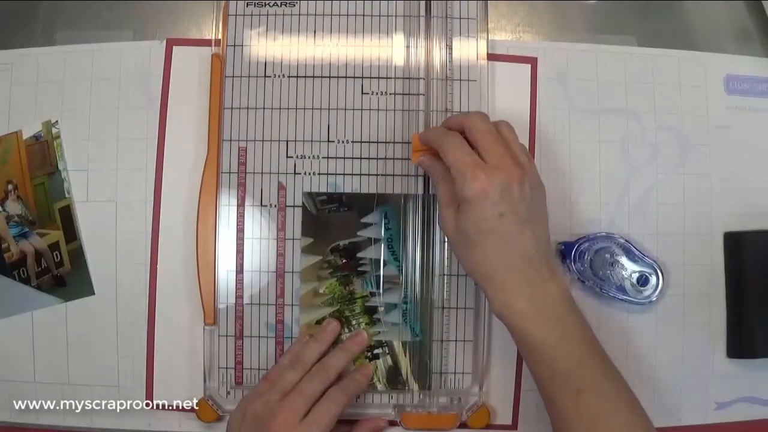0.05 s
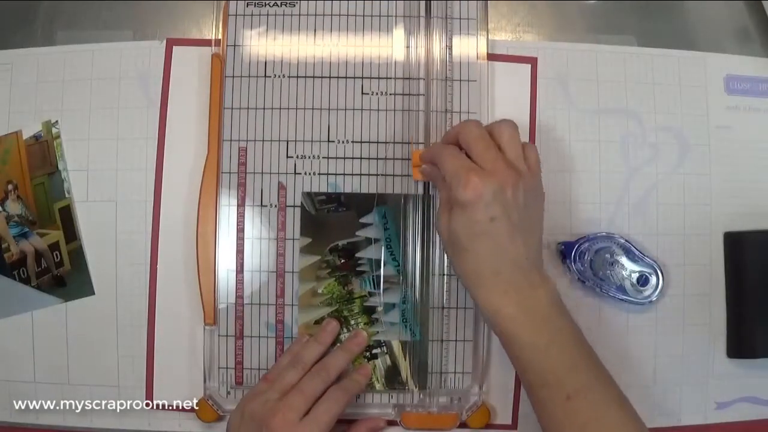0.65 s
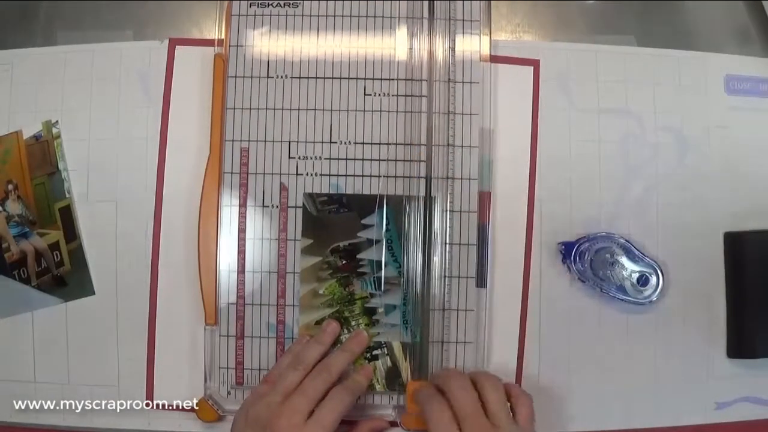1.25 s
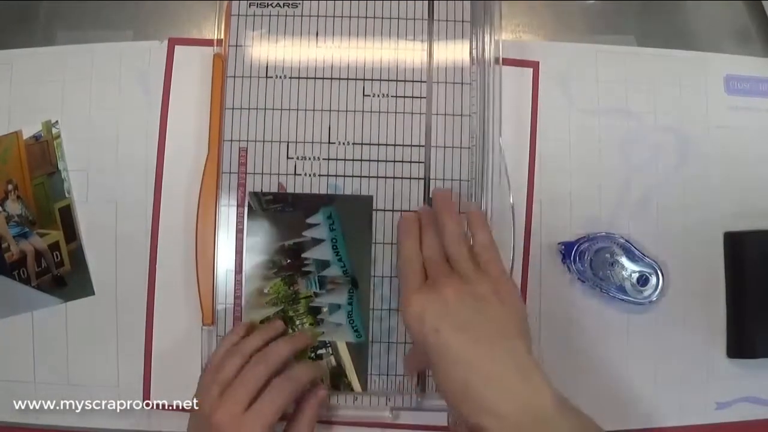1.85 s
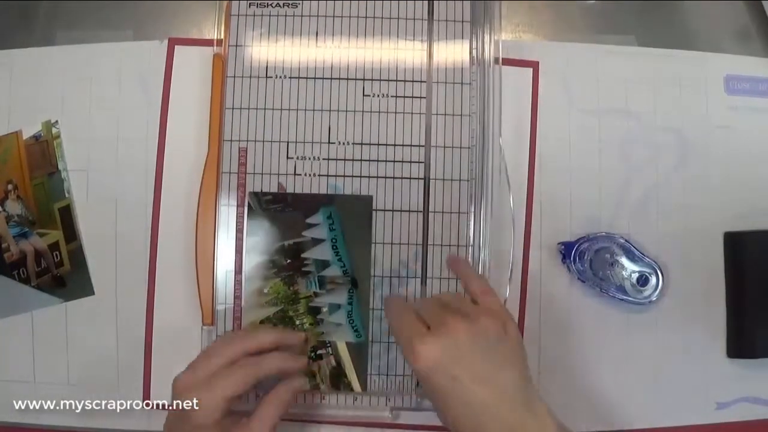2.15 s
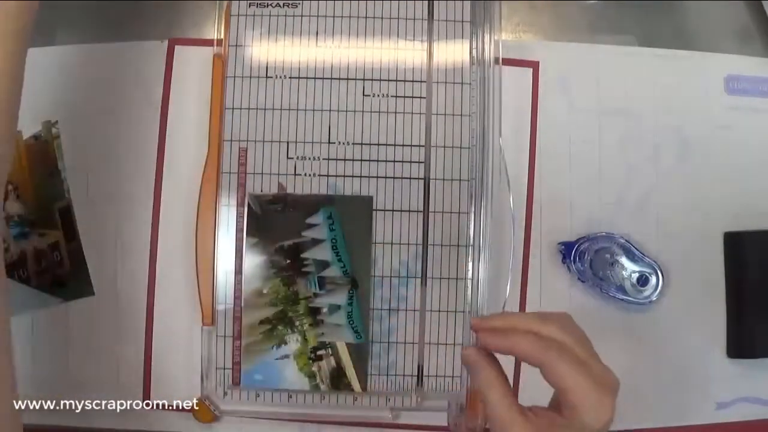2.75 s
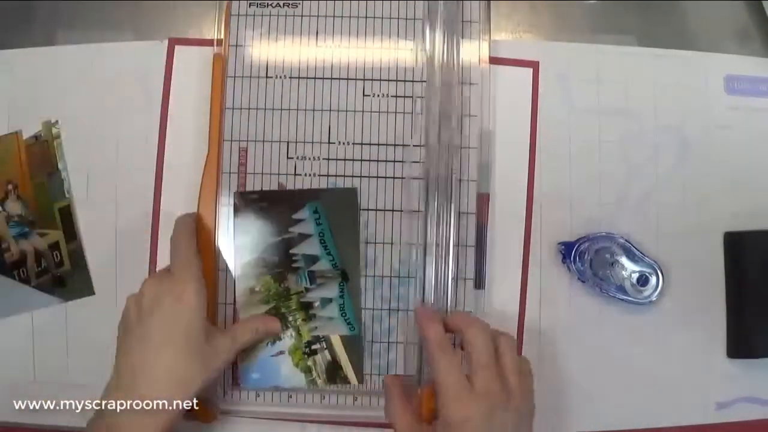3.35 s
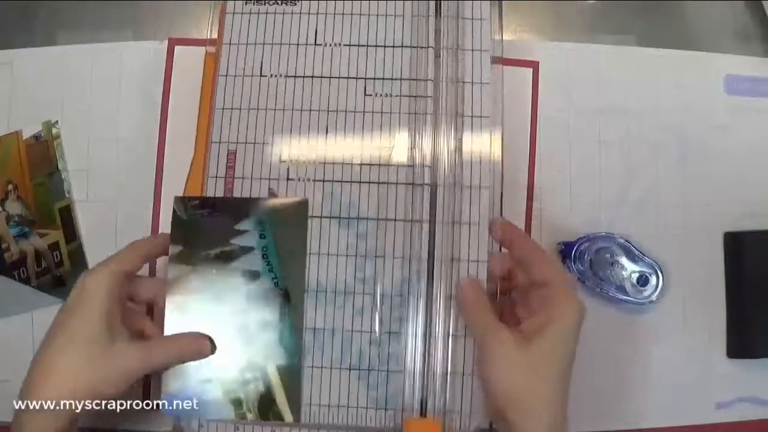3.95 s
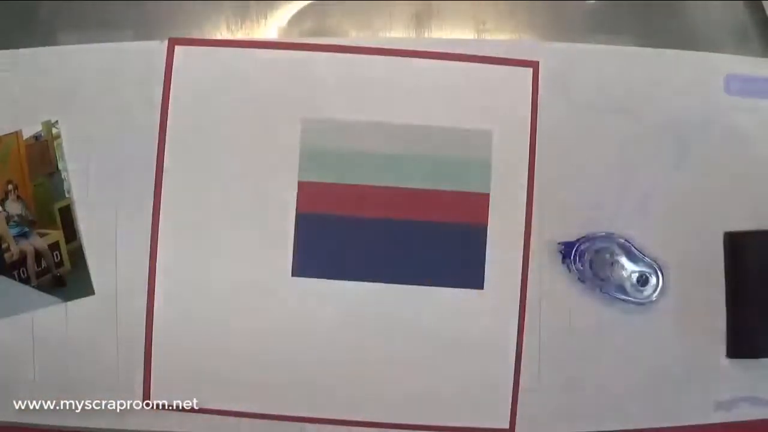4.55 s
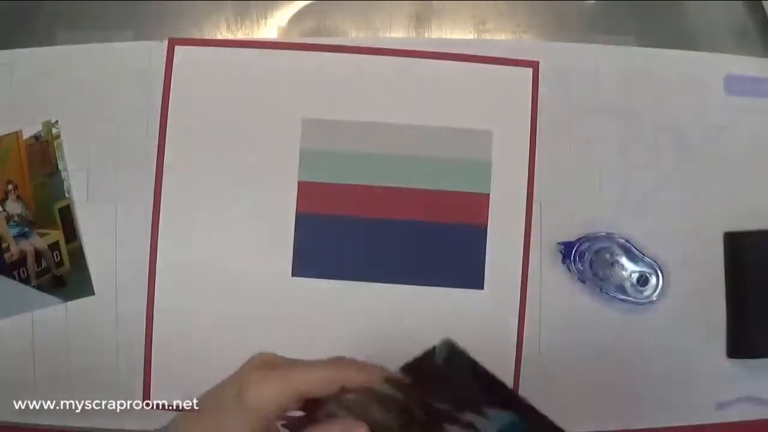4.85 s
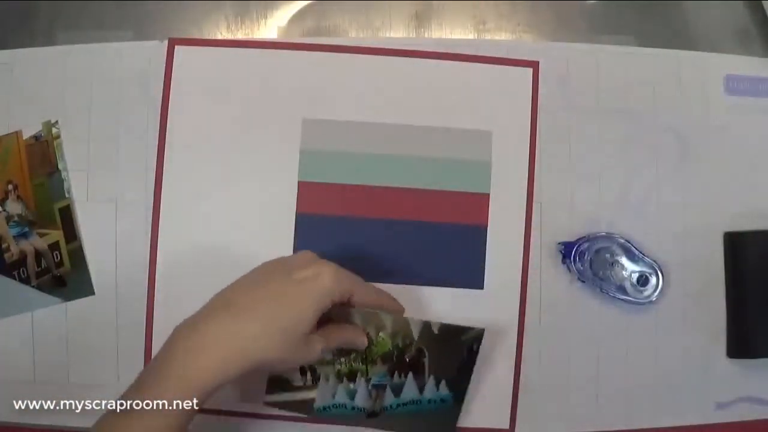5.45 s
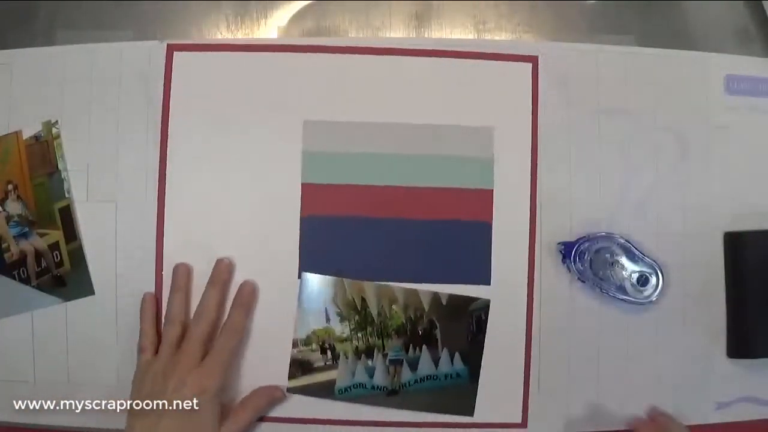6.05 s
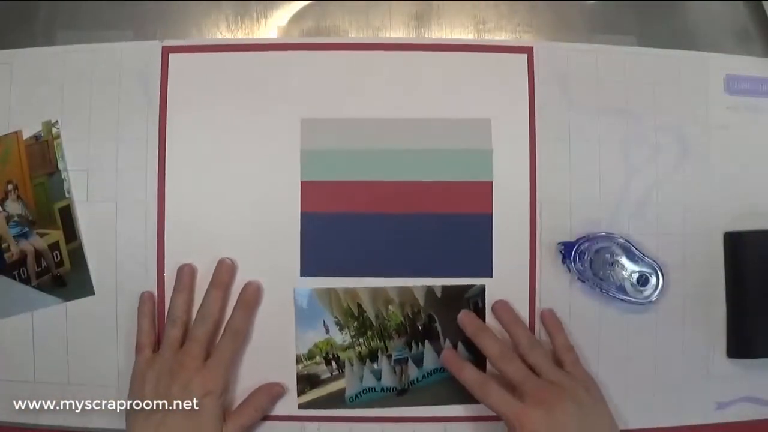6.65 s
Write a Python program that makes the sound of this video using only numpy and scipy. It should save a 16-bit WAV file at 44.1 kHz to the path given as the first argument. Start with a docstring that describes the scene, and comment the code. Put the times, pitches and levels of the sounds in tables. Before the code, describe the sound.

A plastic paper trimmer clicks, and its blade slides through a photo print with a short rising hiss, ending in a sharp knock. Clicks, scuffs and a brief squeak follow as the trimmer is handled, then its rail slaps shut. The trimmer is moved aside with a faint rumble, and the print taps and brushes onto card. The sounds are close, over a table in a quiet room.

```python
"""A blade carriage clicks, hisses down the rail of a plastic paper trimmer and knocks on the stop.
The hiss is the blade parting a photo print. The trimmer scuffs and squeaks as it is handled, and
its rail is opened and slaps shut, making the plastic bed drum. The trimmer is lifted away with a
low rumble; the print taps onto a sheet of card and brushes into place. Behind it all are the air
of a quiet room and the faint ticking of a small camera over the craft table."""
import sys
import numpy as np
from scipy import signal
from scipy.fft import rfft, irfft
from scipy.io import wavfile
from scipy.ndimage import uniform_filter1d

SR = 44100
rng = np.random.default_rng(int(sys.argv[2]) if len(sys.argv) > 2 else 0)


def dump(signal):
    """Clip the signal to [-1, 1] and save it as 16-bit WAV at the path in sys.argv[1]."""
    limited = np.clip(np.atleast_2d(signal).T, -1, 1)
    pcm = np.round(limited * 32767).astype(np.int16)
    wavfile.write(sys.argv[1], SR, pcm)


N = 295029
TIME, FREQS = np.arange(N) / SR, np.fft.rfftfreq(N, 1 / SR)


def amp(db):
    """Turns decibels into a number to multiply by."""
    return 10 ** (np.asarray(db) / 20)


def unit(x):
    """Scales a signal to an average (rms) level of 1."""
    return x / np.sqrt(np.mean(x ** 2) + 1e-20)


def read(points, hz):
    """Reads between the (Hz, value) rows of a table, giving each octave equal room."""
    row_hz, value = np.transpose(points)
    return np.interp(np.log(hz + 1), np.log(row_hz + 1), value)


def add(mix, start_s, sound):
    """Mixes a stereo sound in at the given time."""
    part = mix[:, round(start_s * SR):][:, :sound.shape[1]]
    part += sound[:, :part.shape[1]]


def resonances(rings, hz):
    """The power boost around rings, the pitches at which a thing likes to vibrate."""
    return 1 + sum(amp(db) ** 2 / (1 + (2 * (hz - f) / width) ** 2) for f, width, db in rings)


def coloured(x, colour, rings=()):
    """Gives a sound its colour (the balance of bass and treble) and its rings, at level 1."""
    return unit(irfft(rfft(x) * amp(read(colour, FREQS)) * np.sqrt(resonances(rings, FREQS)), N))


def impulse_response(gain):
    """The quickest answer to a click that has this gain at each frequency."""
    log_gain = np.log(np.maximum(np.r_[gain, gain[-2:0:-1]], 1e-6))
    return np.fft.ifft(np.exp(np.conj(signal.hilbert(log_gain)))).real


def wander(rate_hz):
    """A smooth random wobble at level 1."""
    return unit(irfft(rfft(rng.standard_normal(N)) * np.exp(-(FREQS / rate_hz) ** 2), N))


def swell(start, length, attack_s, release_s):
    """A movement of the hand: it builds up, holds, and dies away."""
    rise = np.clip((TIME - start) / attack_s, 0, 1)
    return rise * np.exp(-np.clip((TIME - start - length) / release_s, 0, 20))


def spread(mid, side, side_db):
    """Makes stereo: two close microphones hear nearly the same thing, most of all in the bass."""
    bass = signal.sosfilt(signal.butter(1, 600, fs=SR, output="sos"), side)
    side = amp(side_db) * (side - bass / 2)
    return np.array([mid + side, mid - side])


def stereo_noise(side_db):
    """An even hiss; the lower side_db is, the more alike left and right are."""
    return spread(*rng.standard_normal((2, N)), side_db)


def panned(x, pan_db):
    """Leans a stereo sound to the left (+) or right (-)."""
    return x * amp(np.array([[.5], [-.5]]) * pan_db)


def friction(grains_per_s, grain_db, hiss_gain, uneven_db, side_db):
    """Fibres catch and let go: snaps of many sizes in a fine hiss, under uneven pressure."""
    sizes = amp(grain_db * np.minimum(rng.exponential(1, N), 5)) * rng.choice([-1, 1], N)
    snaps = unit(sizes * (rng.random(N) < grains_per_s / SR))
    rub = (snaps + hiss_gain * rng.standard_normal(N)) * amp(uneven_db * wander(rate_hz=51))
    return spread(unit(rub), rng.standard_normal(N), side_db)


def scuffed(x, patchy_db, size=9):
    """The contact keeps changing, so narrow bands of the sound briefly flare and fade."""
    bands = signal.stft(x, nperseg=512, noverlap=384)[2]
    chance = rng.standard_normal(bands.shape[1:])
    patches = unit(uniform_filter1d(uniform_filter1d(chance, size, 0), size, 1))
    return signal.istft(bands * amp(patchy_db * patches), nperseg=512, noverlap=384)[1][:, :N]


def registers(sound, split_hz):
    """Splits a rub into body (below split_hz), hiss and treble (above 6000 Hz), each at level 1."""
    above_body, above_hiss = (1 / (1 + (hz / (FREQS + 1)) ** 10) for hz in (split_hz, 6000))
    bands = 1 - above_body, above_body - above_hiss, above_hiss
    return [unit(irfft(rfft(sound) * band, N)) for band in bands]


def stroke(sound, moves, split_hz, attack_s, release_s):
    """Plays a rub once for each move, with that move's own share of treble and body."""
    body, hiss, treble = registers(sound, split_hz)
    swells = np.array([amp(db) * swell(start, length, attack_s, release_s)
                       for start, length, db, _, _ in moves])
    treble_gain, body_gain = amp(np.array(moves)[:, 3:]).T
    return hiss * swells.sum(0) + treble * (treble_gain @ swells) + body * (body_gain @ swells)


def blows(rows, colour, rings, extra_width_hz, crack, rise_s, side_db, size=4096):
    """Each blow is a crack and a dying buzz of tiny contacts that rings the struck thing."""
    out = np.zeros((2, N))
    hz, t = np.fft.rfftfreq(size, 1 / SR), np.arange(2 * size) / SR
    octaves = np.log2(np.maximum(hz, 250) / 1000)
    bass_cut = hz ** 2 / (hz ** 2 + 65 ** 2)
    for start, decay, db, brightness, ring_hz, ring_db in rows:
        # The spot that is struck favours one ring.
        favoured = (ring_hz, extra_width_hz + 0.094 * ring_hz, ring_db)
        ringing = np.sqrt(resonances([*rings, favoured], hz))
        gain = unit(ringing * amp(read(colour, hz) + brightness * octaves) * bass_cut)
        fade = np.exp(-t / decay) * (1 - np.exp(-t / rise_s))
        force, side = rng.standard_normal((2, len(t))) * fade
        force[round(rise_s * SR)] += crack
        force *= np.sqrt(decay * SR / 2) / np.linalg.norm(force)
        blow = signal.fftconvolve(spread(force, side, side_db), impulse_response(gain)[None], axes=1)
        add(out, start, amp(db) * blow)
    return out


def room_air():
    """Room air with a soft drone, and microphone hiss."""
    # The colour of the air. Each row: frequency in Hz, level in dB.
    colour = [(20, -35), (50, -6.5), (100, 2.5), (180, -8), (300, -3.5), (420, -4.5), (600, -9),
              (1000, -10.5), (2000, -13), (4000, -15), (8000, -17.5), (11000, -19)]
    # The drone's notes. Each row: pitch in Hz, width in Hz, height in dB.
    drone = [(149, 22, 11), (254.3, 11, 8.5), (287.4, 3.6, 13)]
    return amp(-59) * coloured(stereo_noise(side_db=-3), colour, drone)


def camera_ticks():
    """The camera mechanism gives a faint, soft pip about thirty times a second."""
    # The tones in a pip. Each row: pitch in Hz, time to fade in seconds, peak level in dB.
    tones = [(3440, 0.0023, -59), (2050, 0.0023, -66.5), (3970, 0.0077, -75), (7800, 0.02, -74)]
    period_s = 1001 / 30000
    t = (TIME - .0398 + period_s / 2) % period_s - period_s / 2  # time from the nearest pip
    return sum(amp(db) * np.exp(-(t / fade) ** 2) * np.cos(2 * np.pi * hz * t) for hz, fade, db in tones)


def room_echo(x, size=22050):
    """Scattered reflections off table and walls, each band dying at its own speed."""
    # The echo's length. Each row: frequency in Hz, seconds to fade by 60 dB.
    fade_times = [(150, 0.43), (500, 0.3), (1500, .26), (3000, 0.17), (6000, 0.2), (10000, 0.14)]
    taps = rng.standard_normal((2, size)) * (rng.random((2, size)) < 4000 / SR)
    taps = spread(*taps, side_db=-6) * (np.arange(size) / SR > .004)
    hz, t, bands = signal.stft(taps, SR, nperseg=256)
    tail = signal.istft(bands * amp(-60 * t / read(fade_times, hz)[:, None]), SR, nperseg=256)[1]
    return signal.fftconvolve(x, tail / np.linalg.norm(tail[0]), axes=1)[:, :N]


def trimmer_rumble():
    """A short, lumpy rumble as the trimmer is put aside."""
    # The rumble: start in seconds, length in seconds, level in dB.
    timing = (4.54, 0.25, -57.5)
    # Its colour. Each row: frequency in Hz, level in dB.
    colour = [(15, -19), (35, 2), (60, -12), (130, -11.5), (250, -38), (1000, -100)]
    start, length, db = timing
    rumble = coloured(stereo_noise(side_db=-20), colour)
    lumpy_gain = amp(db + 1.6 * wander(rate_hz=15))
    return lumpy_gain * rumble * swell(start, length, attack_s=0.017, release_s=0.028)


def table_thuds():
    """The heavy table answers the harder pushes with a short, dull thud."""
    # The pushes. Each row: start in seconds, level in dB.
    pushes = [(1.14, -43), (1.285, -49), (1.36, -44.5), (1.525, -44.5), (3.503, -39), (3.845, -48.5),
              (5.169, -52)]
    # The table's colour. Each row: frequency in Hz, level in dB.
    colour = [(30, -29), (70, -3), (110, 3), (150, 2.5), (210, -9), (300, -4), (600, -33), (2000, -63)]
    rise_s, decay_s = 0.0013, 0.036
    starts, levels_db = np.transpose(pushes)
    age = np.maximum(TIME - starts[:, None], 0)
    loudness = amp(levels_db) @ (np.exp(-age / decay_s) * (1 - np.exp(-age / rise_s)))
    return loudness * coloured(stereo_noise(side_db=-16), colour)


def trimmer_drags():
    """The plastic trimmer scuffs over the table and under the fingers."""
    # Each row: start and length in seconds, hiss level in dB, treble and body in dB above the hiss.
    moves = [(1.304, 0.064, -50.5, -0.5, -17), (1.392, 0.19, -59, 2.5, -2), (1.555, 0.11, -63, 11.5, -1.5),
             (1.67, 0.21, -69.5, -3, -1), (1.863, 0.087, -62, 2, -3), (2.005, .05, -61, 1, -7),
             (2.36, 0.076, -68.5, 8, -14), (2.734, 0.019, -62, 10, -1), (2.984, 0.028, -55, 2, -4),
             (3.119, 0.14, -59.5, 0.5, -3), (3.275, 0.187, -55.5, 2.5, -6), (3.58, 0.12, -58, 1.5, -5.5),
             (3.763, 0.19, -62.5, 4, -2), (3.964, 0.14, -61.5, 3.5, 6), (4.12, 0.14, -60, 4.5, 2.5),
             (4.283, 0.15, -56.5, 5.5, 2.5)]
    # The scuff's colour. Each row: frequency in Hz, level in dB.
    colour = [(60, -3), (130, 3.5), (200, 5.5), (350, 6), (470, 2), (700, 3.5), (1200, -2), (1700, -7.5),
              (2800, -1), (5200, -0.5), (7000, -2.5), (9500, 1), (11000, -10)]
    # Its rings. Each row: pitch in Hz, width in Hz, height in dB.
    rings = [(412, 130, 5), (1710, 200, 8), (4900, 330, -18.5)]
    rub = friction(grains_per_s=900, grain_db=7.9, hiss_gain=2.9, uneven_db=1.86, side_db=-16.5)
    rub = coloured(scuffed(rub, patchy_db=1.8), colour, rings)
    return stroke(rub, moves, split_hz=870, attack_s=0.021, release_s=0.023)


def edge_scrapes():
    """A dragged edge briefly sings on one note as rubbing feeds a single ring of the plastic."""
    # Each row: start in seconds, length in seconds, level in dB, pitch in Hz.
    scrapes = [(1.37, 0.095, -58.5, 2060), (2.693, 0.032, -56.5, 450), (3.048, 0.012, -53.5, 9000),
               (3.93, 0.17, -59, 1620), (3.99, 0.066, -55.5, 5050)]
    spectrum = rfft(stereo_noise(side_db=-13))
    out = np.zeros((2, N))
    for start, length, db, hz in scrapes:
        note = unit(irfft(spectrum / (1 + ((FREQS - hz) / (0.087 * hz)) ** 2), N))
        out += amp(db) * note * swell(start, length, attack_s=0.021, release_s=0.023)
    return out


def plastic_squeak():
    """The plastic quickly sticks and slips, stirring a few high rings."""
    # Each row: start in seconds, length in seconds, level in dB.
    squeaks = [(2.8234, 0.0098, -30.5), (2.842, 0.0094, -39)]
    # The squeak's colour. Each row: frequency in Hz, level in dB.
    colour = [(200, -22), (800, -12.5), (2000, -7), (4000, 1), (6000, 2.5), (7500, -7), (9000, -3),
              (11000, -24)]
    # Its rings. Each row: pitch in Hz, width in Hz, height in dB.
    rings = [(5760, 300, 5.5), (6300, 400, 15), (6600, 500, 5.1)]
    slips = friction(grains_per_s=1500, grain_db=2.1, hiss_gain=1, uneven_db=1.5, side_db=-16)
    grip = sum(amp(db) * swell(start, length, attack_s=.002, release_s=0.013)
               for start, length, db in squeaks)
    return panned(coloured(slips, colour, rings) * grip, pan_db=2)


def print_slides():
    """Photo paper and card brush over one another."""
    # Each row: start and length in seconds, hiss level in dB, treble and body in dB above the hiss.
    moves = [(4.552, 0.072, -58, 5, -6.5), (4.622, 0.14, -53.5, 2.5, -7.5), (4.821, .05, -56.5, -1.5, -2.5),
             (5.053, 0.21, -53.5, 2, -2.5), (5.252, 0.23, -55.5, -1.5, -1), (5.489, 0.07, -55, 6.5, -2),
             (5.597, 0.11, -61, -1, -0.5), (5.978, .16, -49, 3.5, -17), (6.155, 0.13, -57, 4, -5),
             (6.289, 0.11, -62.5, 4.5, -21), (6.361, 0.17, -59, 3, -8), (6.551, 0.1, -59, 2, -11)]
    # The brushing's colour. Each row: frequency in Hz, level in dB.
    colour = [(60, -2), (150, -1), (300, 2.5), (600, 0), (950, -1.5), (1400, 1), (2200, -2.5), (3300, 0),
              (5000, 1), (7000, 7.5), (9500, 11), (11000, 1.5)]
    rub = friction(grains_per_s=700, grain_db=8.1, hiss_gain=2.8, uneven_db=0.57, side_db=-18)
    rub = coloured(scuffed(rub, patchy_db=2.2), colour)
    return stroke(rub, moves, split_hz=2000, attack_s=0.045, release_s=0.022)


def print_taps():
    """The print and the card flex and tap."""
    # Each row: start and decay in seconds, level in dB, brightness in dB per octave,
    # favoured ring in Hz, its height in dB.
    taps = [(4.679, .0052, -31, -2.5, 3330, 17.5), (4.763, 0.0038, -30, -3, 3100, 18),
            (5.0735, 0.0067, -40.5, -0.5, 7250, 14), (5.0911, 0.0052, -48.5, -6, 7990, 7),
            (5.1147, .0018, -37, 1, 7490, 8), (5.1287, .003, -36, 3, 7720, 6),
            (5.1643, .011, -32.5, -2, 5200, 2), (5.1672, 0.0016, -19, 0.5, 5060, 4),
            (5.177, 0.019, -32.5, -2.5, 5300, 4), (5.2128, 0.01, -33.5, 2, 4570, 7),
            (5.228, .0039, -36, 2.5, 5000, 1), (5.2672, 0.0021, -34.5, 3, 7070, 2),
            (5.299, 0.017, -42.5, -5.5, 473, 19), (5.3369, 0.0068, -36, -0.5, 4300, 9),
            (5.3607, 0.0022, -35, -1.5, 920, 16), (5.4876, 0.0084, -41, -1, 910, 23),
            (5.5688, 0.0057, -34.5, 3, 1970, 19), (5.5778, 0.0042, -26, 4, 4800, 8.5),
            (5.6073, 0.016, -44.5, -2, 1010, 18), (5.6699, .0022, -27.5, 4.5, 2520, 13),
            (6.5516, 0.0054, -39.5, -2, 354, 18), (6.6176, .0009, -22, 7.5, 9400, 0)]
    # The taps' colour. Each row: frequency in Hz, level in dB.
    colour = [(60, -16), (150, -9), (300, -12.5), (600, -8), (2000, -9), (4200, -6.5), (8000, -5.5),
              (11000, -13)]
    # The card's rings. Each row: pitch in Hz, width in Hz, height in dB.
    rings = [(995, 39, 8.6), (2350, 370, 3.4), (3440, 830, 3.7), (4980, 170, 0.67)]
    return blows(taps, colour, rings, extra_width_hz=78, crack=2.4, rise_s=0.00036, side_db=-10.5)


def bed_knocks():
    """Carriage, fingers and rail knock on the trimmer's plastic bed."""
    # Each row: start and decay in seconds, level in dB, brightness in dB per octave,
    # favoured ring in Hz, its height in dB.
    knocks = [(0.5547, 0.0049, -29.5, -5, 620, 2), (0.5603, 0.0027, -34.5, 2, 3440, 12),
              (0.6893, 0.02, -41, -4.5, 440, 9), (0.7288, 0.0067, -46, -5, 200, -9),
              (0.746, 0.032, -39, 0, 9200, 12), (1.1252, 0.0012, -23, 0, 650, 15),
              (1.1372, 0.0048, -13, 0.26, 3420, 11.5), (1.2799, 0.0099, -34.5, 0, 2840, 10),
              (1.2873, 0.013, -42.5, -3, 565, 11), (1.316, 0.042, -46, -2, 1140, 11),
              (1.3669, 0.0069, -30.5, -6, 960, 17), (1.5085, 0.0036, -31, 1, 8410, 10),
              (1.5153, 0.0069, -26.5, 0.5, 8440, 15), (1.527, 0.0042, -19.5, 4.5, 2140, 12.5),
              (1.5326, 0.0048, -24.5, 3.5, 5200, 9), (1.5477, 0.01, -27.5, 3, 4970, -2),
              (1.8673, 0.0062, -42, 2.5, 6440, 3), (2.0858, 0.0051, -44.5, 0, 6940, 4),
              (2.1602, 0.0079, -45, 3, 9400, 8), (2.844, .005, -31, 6.5, 9200, 5),
              (2.8947, 0.0027, -30, 1, 1620, 19), (2.9573, 0.016, -37, 6.5, 8200, 14),
              (2.9722, 0.0052, -37, -3.5, 1650, 21), (3.0537, 0.012, -42.5, -1.5, 9000, 30),
              (3.1394, .014, -47.5, -1, 8400, 1), (3.1564, 0.003, -26, 5.5, 1570, 17),
              (3.1963, 0.012, -40, -4, 2070, 21), (3.2185, 0.0066, -33.5, 0.5, 2050, 9),
              (3.2701, .0013, -26, 7, 4240, 18), (3.688, 0.032, -47, -2, 1070, 11),
              (3.8335, 0.0042, -22.5, 3.5, 645, 20), (4.0564, 0.0062, -37, 0, 586, 19),
              (4.0742, 0.0053, -35, 3.5, 9800, 10), (4.1441, 0.0037, -40, -3.5, 5230, 18),
              (4.3114, .009, -38.5, 5.5, 8230, 14), (4.3856, 0.0036, -24, 2.5, 8230, 21),
              (4.4163, 0.0054, -38.5, 4, 9180, 8)]
    # The knocks' colour. Each row: frequency in Hz, level in dB.
    colour = [(60, -16), (150, -4), (300, -3.5), (600, -2), (2000, -5), (4200, -4), (8000, -11),
              (11000, -11.5)]
    # The bed's rings. Each row: pitch in Hz, width in Hz, height in dB.
    rings = [(636, 74, 3), (1010, 24, -1), (1280, 38, 2), (1760, 110, 4.5), (2090, 97, 2), (2790, 180, 6),
             (3180, 220, 2), (5340, 680, 1), (8640, 540, 6)]
    return blows(knocks, colour, rings, extra_width_hz=35, crack=2.6, rise_s=0.00048, side_db=-14)


def bed_boom():
    """The wide bed drums when the rail lands on it; its low notes take a moment to build."""
    # Each row: pitch in Hz, level in dB, seconds to fade by 60 dB.
    notes = [(300, -55, 0.14), (461, -30.5, 0.16), (511, -23.5, 0.1), (606, -40, 0.13), (780, -42, 0.17),
             (1000, -29, 0.12)]
    start_s, rise_s = 3.524, 0.0034
    t = np.maximum(TIME - start_s, 0)
    boom = sum(amp(db - 60 * t / fade) * np.sin(2 * np.pi * (hz * t + rng.random()))
               for hz, db, fade in notes)
    return panned(boom * (1 - np.exp(-t / rise_s)), pan_db=-1.2)


def rail_slam():
    """The rail falls shut and chatters."""
    # Each row: start and decay in seconds, level in dB, brightness in dB per octave,
    # favoured ring in Hz, its height in dB.
    bounces = [(3.4887, .0075, -12.5, -1, 2670, 4), (3.4982, 0.031, -24.5, 0, 990, 1),
               (3.5112, 0.027, -24, -1.5, 2010, 0), (3.5259, 0.011, -24.5, -3, 500, 3),
               (3.5398, 0.031, -31, -1, 480, 3), (3.6106, 0.0051, -41, -3, 3940, 10)]
    # The slam's colour. Each row: frequency in Hz, level in dB.
    colour = [(60, -20), (150, -13), (300, -10.5), (600, -6), (1200, -5), (2000, 0.5), (4200, 0),
              (8000, -1), (11000, -7)]
    # The rail's rings. Each row: pitch in Hz, width in Hz, height in dB.
    rings = [(285, 13, 8.6), (443, 28, 11.6), (500, 51, 14), (588, 30, 16), (840, 38, 7.3), (960, 78, 13.3),
             (1070, 15, 7.5), (1760, 16, 3.8), (1890, 150, 3), (2140, 53, 5.2), (2900, 45, 5.7),
             (3000, 44, 2.7), (4930, 28, 1.8), (5990, 100, 5.4), (8950, 240, 7)]
    return blows(bounces, colour, rings, extra_width_hz=60, crack=5, rise_s=.0002, side_db=-13)


def blade_cut():
    """The blade parts the paper as the carriage rubs the rail: the faster, the louder and brighter."""
    # The carriage's run. Each row: time in seconds, share of full speed.
    run = [(.57, .12), (.63, 0.14), (.69, 0.44), (.76, 0.37), (.83, 0.57), (.93, 0.86), (1.03, 0.88),
           (1.09, 0.71), (1.13, .85)]
    # The cut's colour. Each row: frequency in Hz, level in dB.
    colour = [(35, -28), (60, -10), (90, -7), (150, 6), (220, -9.5), (330, -6.5), (530, -1.5), (1040, -8),
              (2240, -1.5), (4600, -2), (6000, -3.5), (8500, -1), (11000, -7.5)]
    # Its rings. Each row: pitch in Hz, width in Hz, height in dB.
    rings = [(576, 530, 3.4), (2360, 260, 1.9), (3400, 450, 4.7), (5540, 720, 5.6)]
    tear = friction(grains_per_s=7000, grain_db=1.3, hiss_gain=0.55, uneven_db=0.26, side_db=-37)
    tear = coloured(scuffed(tear, patchy_db=2.5, size=5), colour, rings)
    body, hiss, treble = registers(tear, split_hz=720)
    speed = np.interp(TIME, *np.transpose(run), left=0, right=0)
    in_paper = swell(start=.748, length=.378, attack_s=0.015, release_s=.004)
    load = np.maximum(in_paper, amp(-13))  # the carriage is quieter when it runs free
    # The bed drones less as the carriage nears its supported end.
    damped_from_s, damping_db_per_s = 0.86, 39
    body_db = -47 - damping_db_per_s * np.maximum(TIME - damped_from_s, 0)
    return load * (amp(-38.5) * hiss * speed ** 0.75
                   + amp(-34) * treble * speed ** 1.22
                   + amp(body_db) * body * speed ** 0.23)


def scene():
    """All the knocking and rubbing on the table, with its echo and the background."""
    # The print moves from the right to the middle. Each row: time in seconds, pan in dB.
    print_path = [(4.7, -1.5), (5.15, -3.5), (5.4, -1.5), (5.6, -0.5), (6.6, 0)]
    pan_db = np.interp(TIME, *np.transpose(print_path))
    hits = bed_knocks() + rail_slam() + panned(print_taps(), pan_db) + bed_boom() + table_thuds()
    rubs = blade_cut() + trimmer_drags() + edge_scrapes()
    rubs += panned(print_slides(), pan_db) + plastic_squeak()
    echo = room_echo(amp(-10.5) * hits + amp(-10) * rubs)
    return hits + rubs + echo + room_air() + trimmer_rumble() + camera_ticks()


def record(dry):
    """Takes away the highest treble."""
    cutoff_hz = 11120
    low_pass = signal.firwin(401, cutoff_hz, window=("kaiser", 8), fs=SR)
    return signal.oaconvolve(dry, low_pass[None], "same")


dry = scene()
out = record(dry)
dump(out)
```